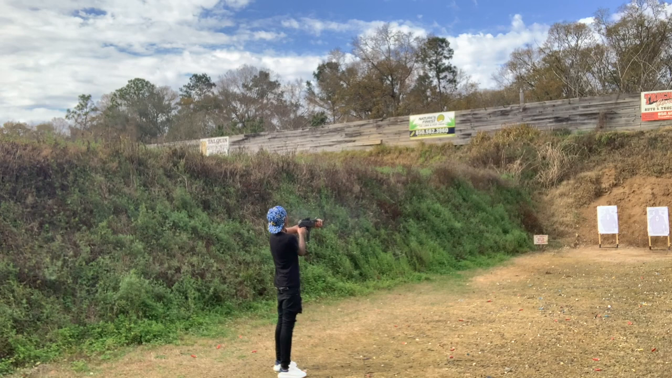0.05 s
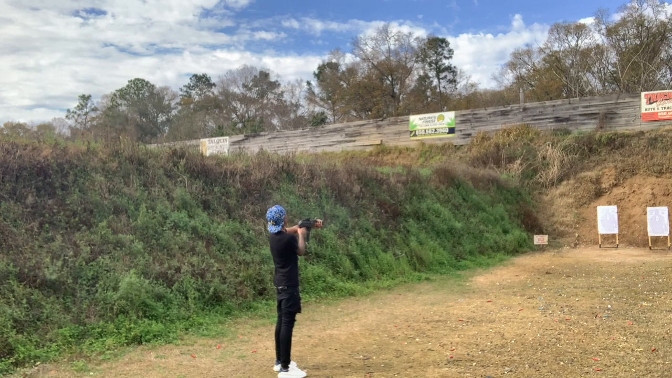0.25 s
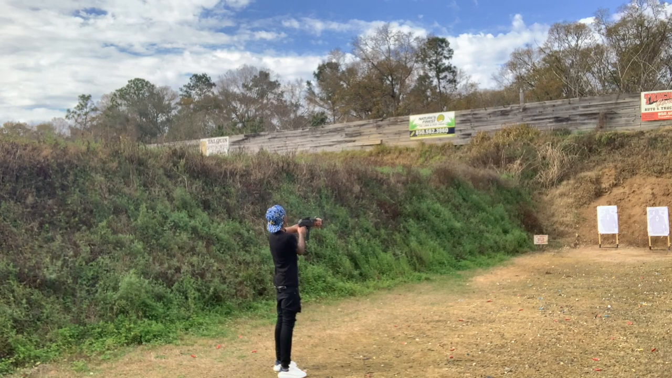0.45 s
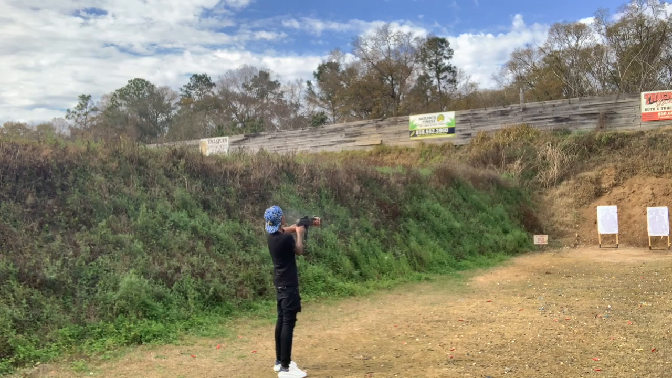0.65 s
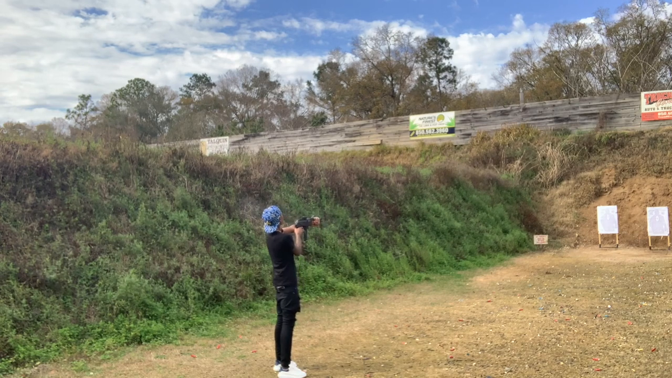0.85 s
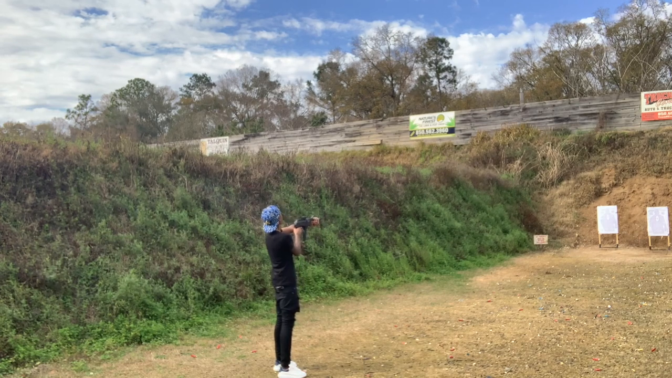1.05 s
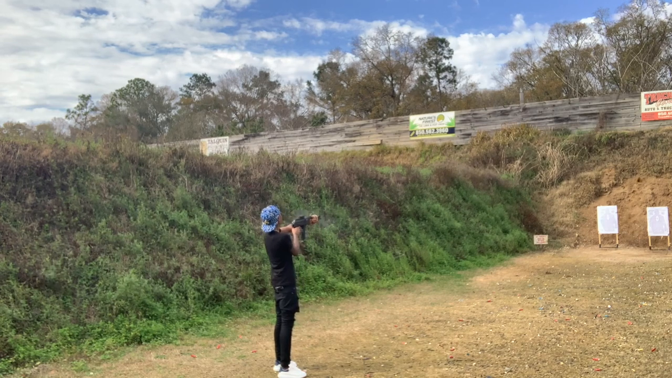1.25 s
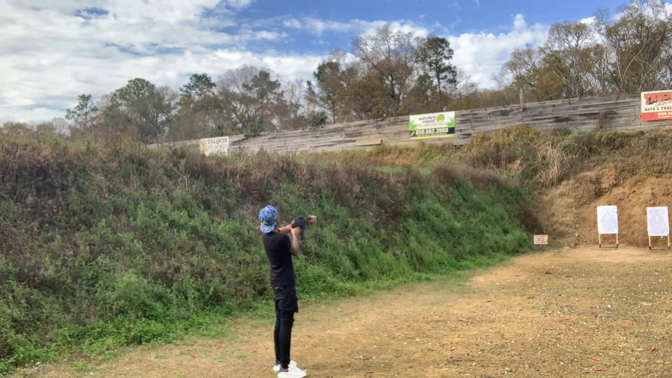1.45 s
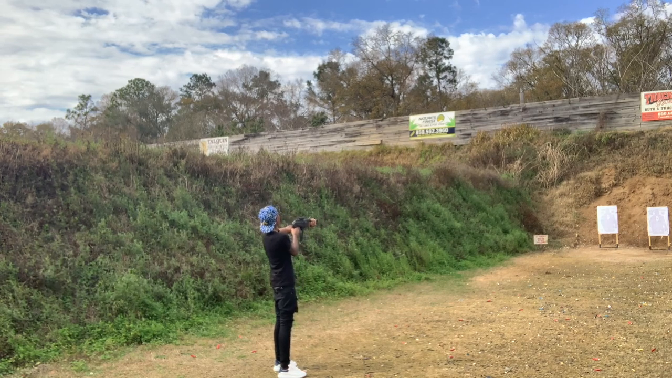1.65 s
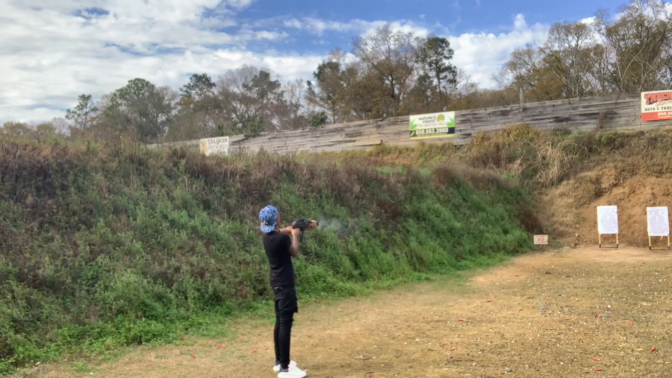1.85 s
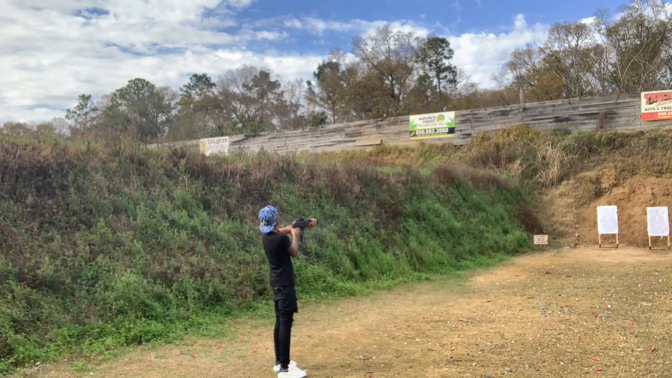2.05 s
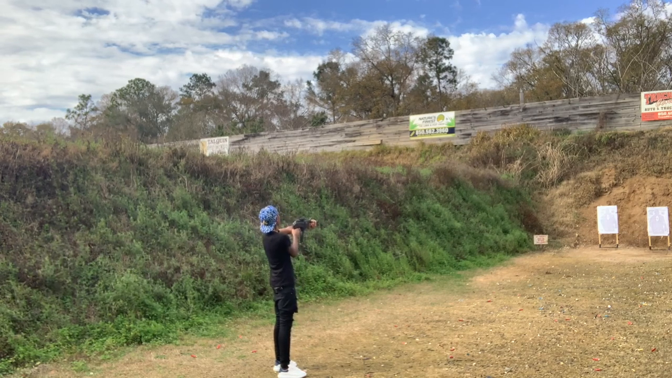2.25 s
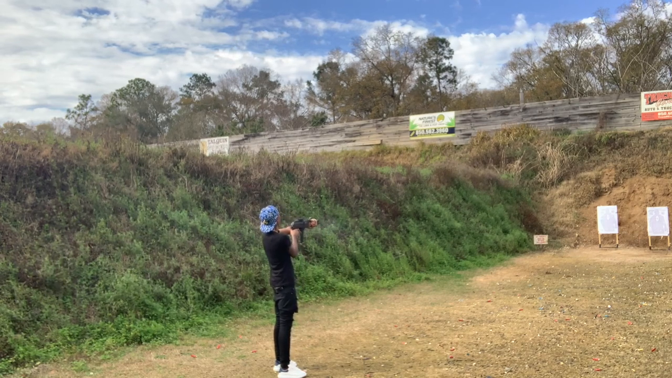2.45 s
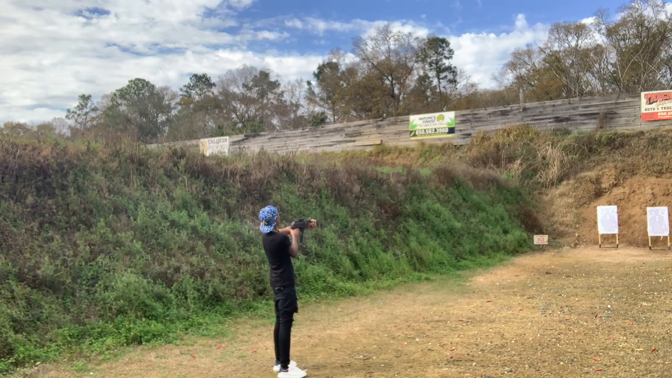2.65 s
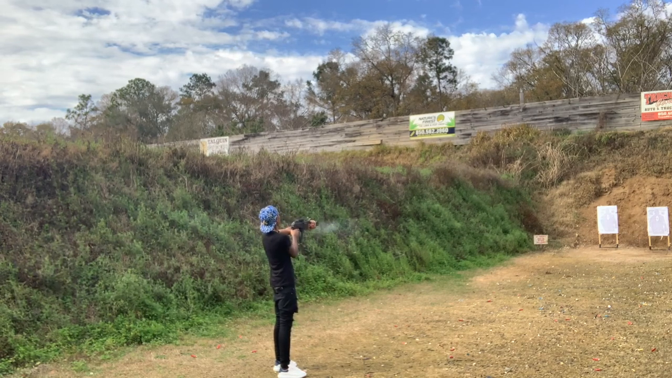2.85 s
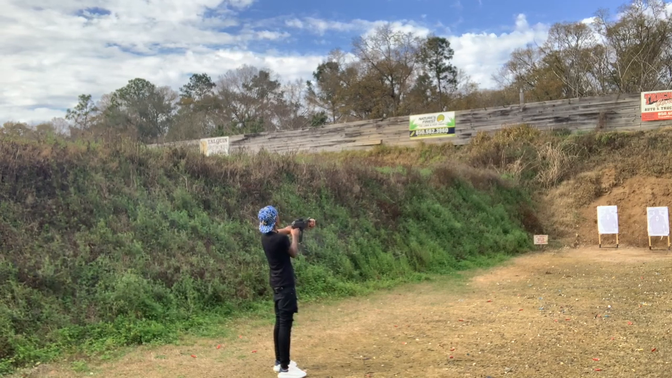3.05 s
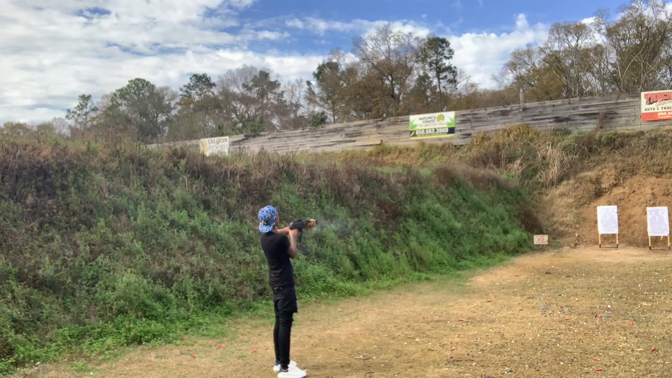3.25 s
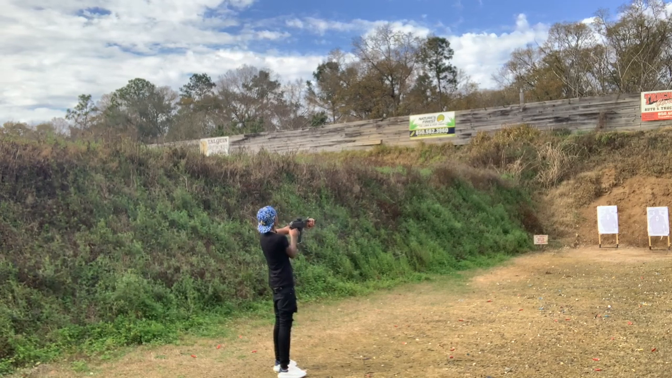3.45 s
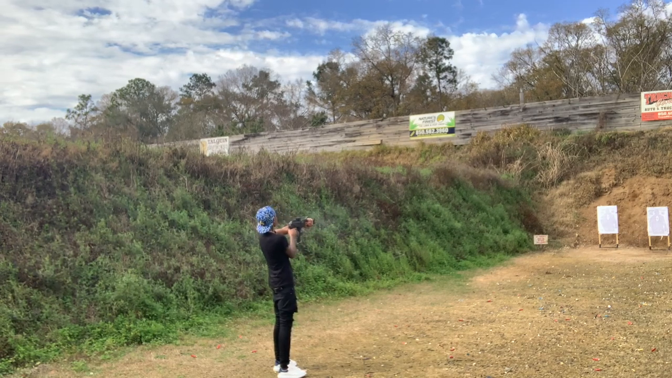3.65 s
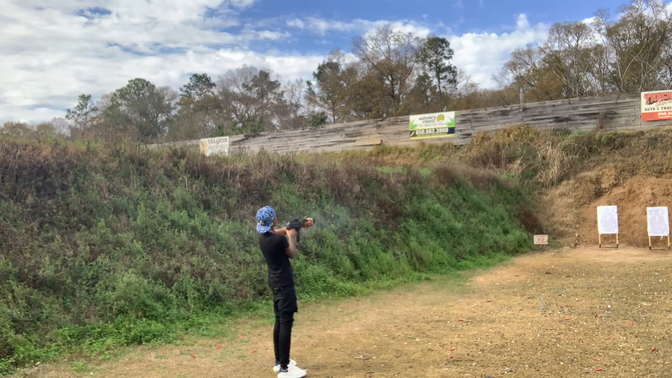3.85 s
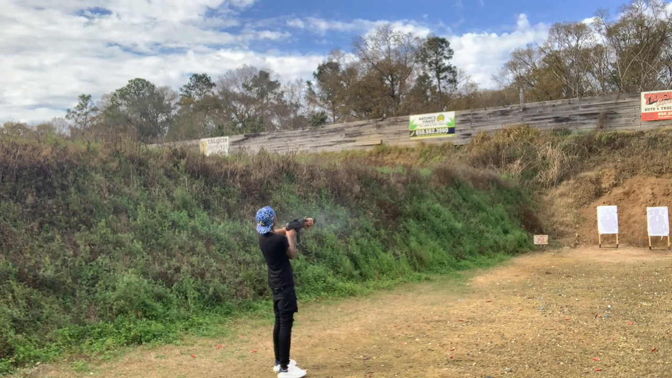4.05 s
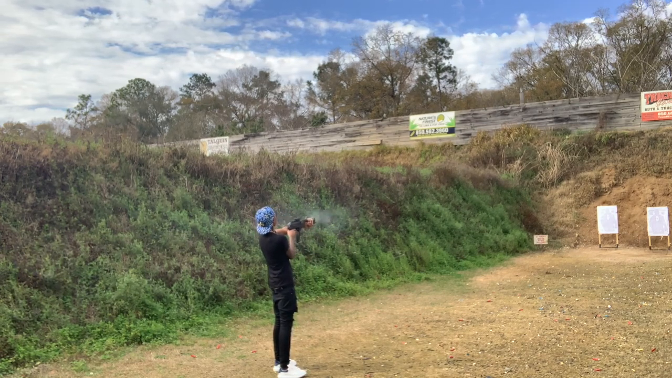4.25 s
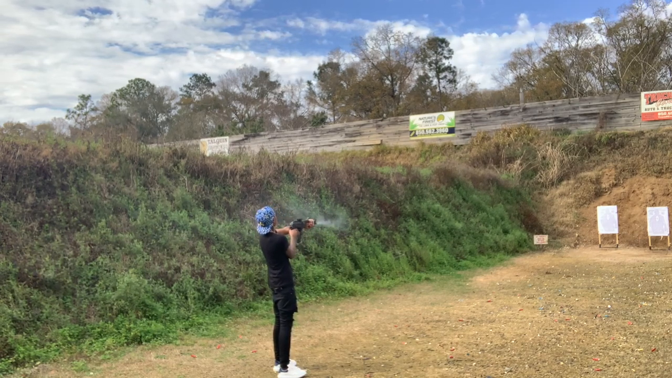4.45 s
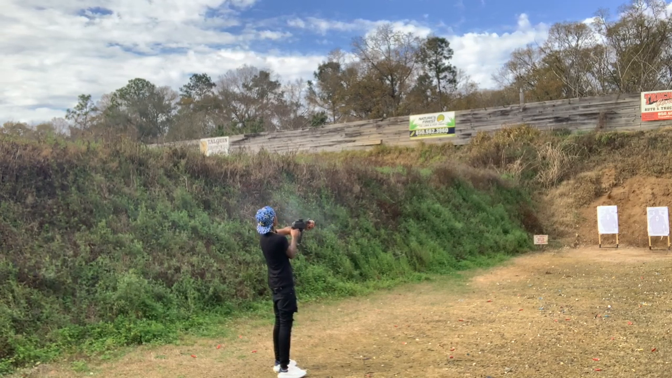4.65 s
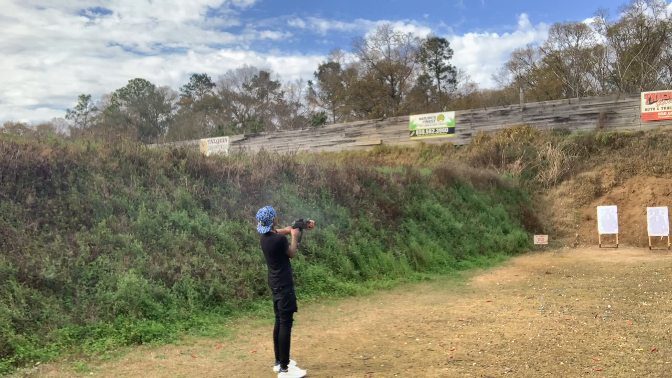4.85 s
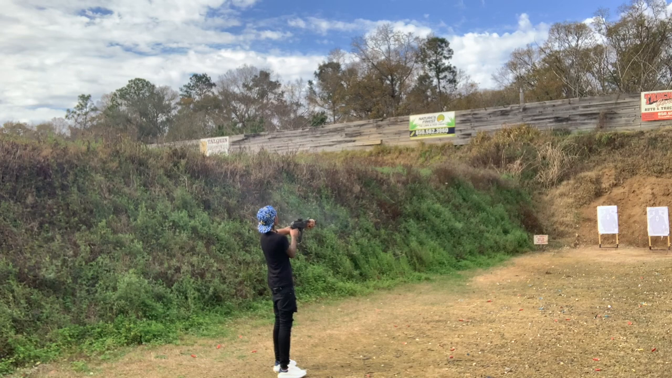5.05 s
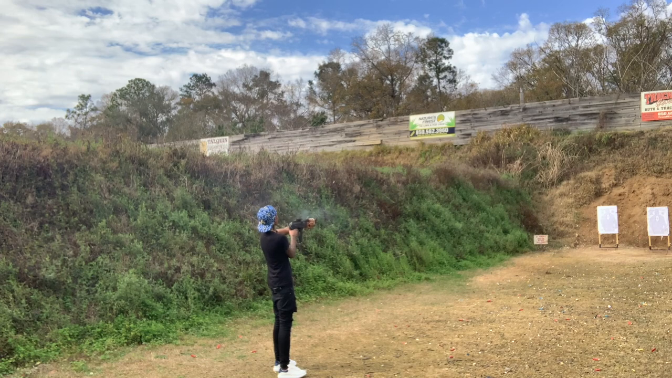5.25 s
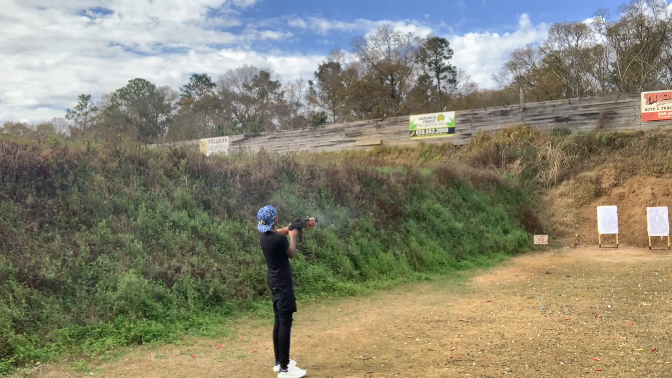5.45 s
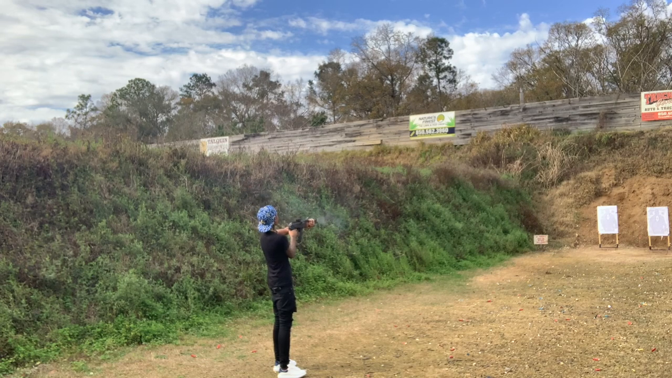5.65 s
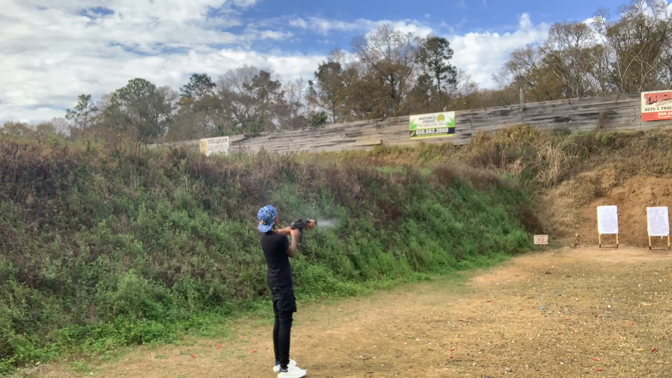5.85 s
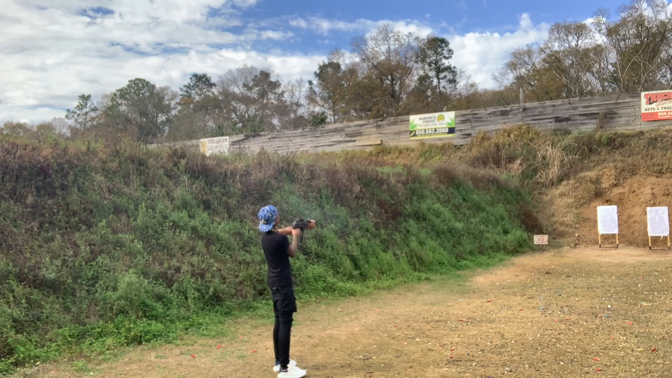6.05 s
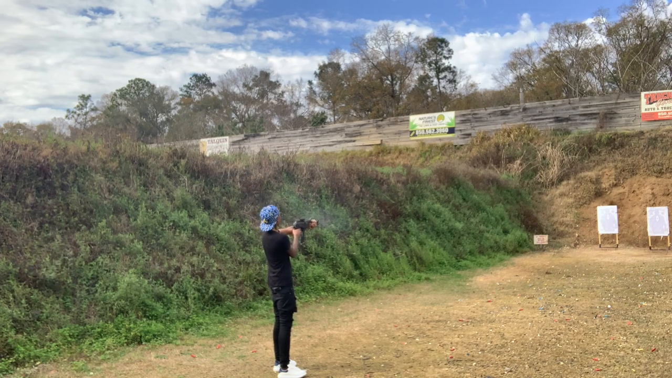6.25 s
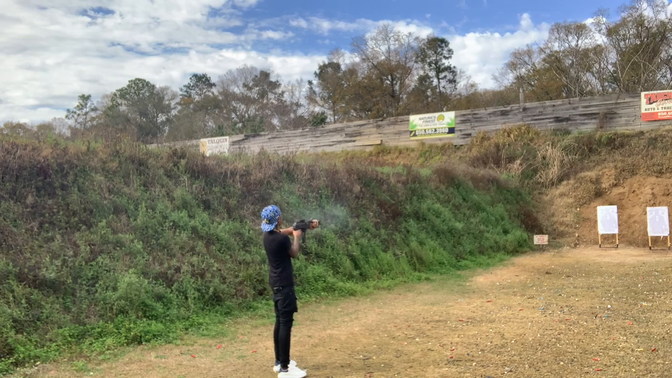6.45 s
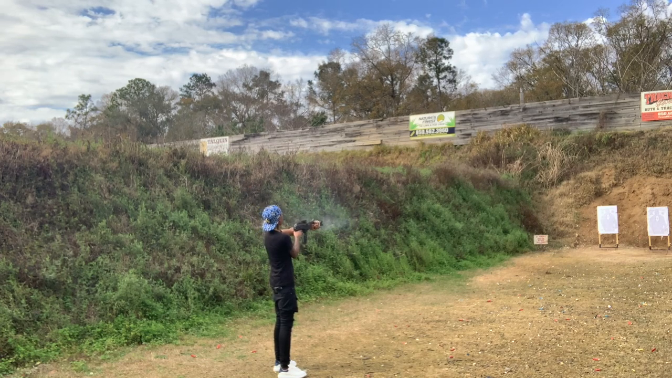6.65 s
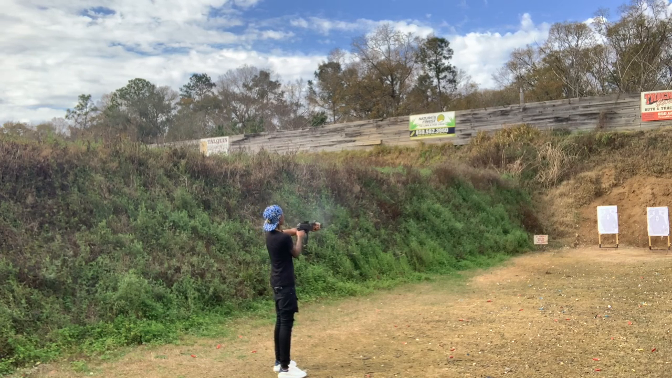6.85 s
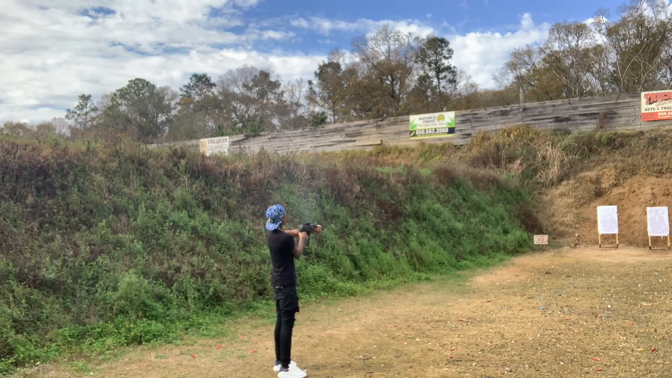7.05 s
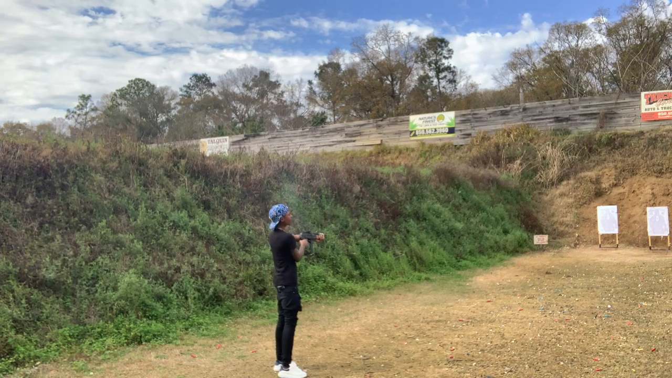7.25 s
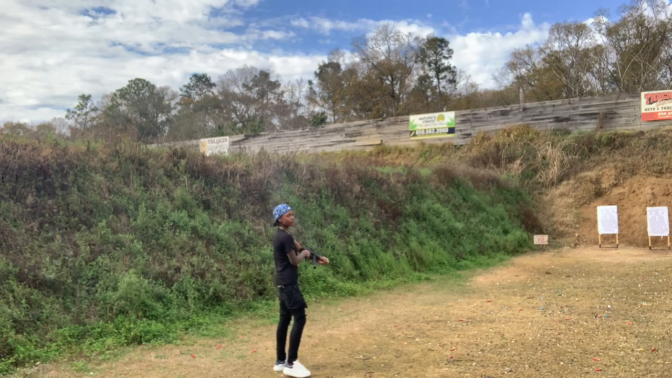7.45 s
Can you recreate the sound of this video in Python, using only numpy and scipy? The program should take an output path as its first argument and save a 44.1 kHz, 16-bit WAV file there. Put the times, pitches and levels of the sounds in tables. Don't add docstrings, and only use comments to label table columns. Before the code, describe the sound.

An open-air shooting range with earth banks, heard in stereo from a phone some metres behind the rifle. For the first half second, low gusts and soft pops buffet the microphone over the fading roll of an earlier shot. At 0.49 s a hard, overloaded crack bursts out, with more at about 1.17, 1.84, 2.38, 2.84, 3.2 and 3.5 s, the gaps shrinking. From about 3.8 to 6.6 s the shots run in an even string, roughly four per second, twenty in all. Each has a steep crack, brief gas rush and short low thump, then a bright slap from the right bank a tenth of a second later, a duller second slap and diffuse roll from trees. Dull knocks sound near 1.3, 2.0 and 6.5 s; brass cases tink faintly, clearest around 5.5 and 6.9 s. After the last shot the echo dies into light wind.

```python
import sys
import numpy as np
from scipy import signal
from scipy.fft import rfft, irfft, next_fast_len
from scipy.io import wavfile
from scipy.ndimage import uniform_filter1d

SR = 44100
rng = np.random.default_rng(int(sys.argv[2]) if len(sys.argv) > 2 else 0)


def int16_out(signal):
    q = np.round(np.clip(np.atleast_2d(signal).T, -1, 1) * 32767)
    wavfile.write(sys.argv[1], SR, q.astype(np.int16))


def to_linear_factor(level_db):
    exponent = np.asarray(level_db, float) / 20
    return 10 ** exponent


N = 331191
LEAD = .03


def burst(t, rise, fall):
    return np.exp(-np.abs(t) / np.where(t < 0, rise, fall))


def at(table, s):
    power = sum((to_linear_factor(db) * burst(s - peak, abs(rise), abs(fall))) ** 2 for peak, db, rise, fall in table)
    return np.sqrt(power)


def colour(x, spectrum, lag=0):
    size = next_fast_len(x.shape[-1])
    hz = np.maximum(np.fft.rfftfreq(size, 1 / SR), 1)
    points_hz, points_db = np.array(spectrum).T
    gain = to_linear_factor(np.interp(np.log(hz), np.log(points_hz), points_db))
    gain = gain / np.sqrt(np.mean(gain ** 2))
    gain = gain * np.exp(-2j * np.pi * lag * np.log(hz))
    return irfft(rfft(x, size) * gain, size)[..., :x.shape[-1]]


def scatter(length, same, alike):
    size = 2 ** int(np.log2(length * SR) + 1)
    fixed = rng.standard_normal((1, 3, size))
    fresh = rng.standard_normal((len(SHOTS), 3, size))
    x = np.sqrt(same) * fixed + np.sqrt(1 - same) * fresh
    return np.arange(size) / SR, np.sqrt(alike) * x[:, :1] + np.sqrt(1 - alike) * x[:, 1:]


def late(x, s):
    return np.roll(x, int(s * SR), axis=-1)


def add(out, sound, s):
    i = int(s * SR)
    out[:, i:i + sound.shape[-1]] += sound[..., :N - i]


def walk(rate):
    k = int(SR / rate)
    held = np.repeat(rng.standard_normal((2, N // k + 1)), k, axis=1)
    return 0.97 * uniform_filter1d(held, k)[:, :N]


# peak_s, level_db, rise_s,
# fall_s
GUSTS = [(.19, -20.5, 0.089, .3), (.345, -21.5, .08, 0.095), (.472, -16, 0.018, 0.023),
         (.606, -36, 0.023, 0.036), (.688, -23.5, 0.0057, .02), (.735, -32, 0.016, 0.064),
         (1.15, -44, 0.0076, 0.037), (1.52, -33.5, 0.012, .1), (1.646, -32.5, 0.1, .02),
         (1.83, -34, 0.0093, 0.028), (1.96, -35.5, .006, .2), (2.074, -28.5, 0.016, 0.058),
         (2.194, -30, 0.014, 0.34), (2.4, -39, .03, 0.27), (2.64, -35, .015, 0.026),
         (2.79, -31.5, 0.029, .05), (3.138, -29.5, 0.077, 0.011), (3.2, -32, 0.019, 0.071),
         (3.35, -42, 0.033, 0.18), (3.52, -32, 0.0034, 0.029), (3.71, -42, 0.11, .5),
         (4.51, -41, 0.38, 0.64), (5.07, -34, 0.11, 0.083), (5.5, -34, 0.027, .06), (5.9, -43, 0.59, .3),
         (6.225, -27.5, 0.02, .025), (6.5, -39.5, 0.12, 0.15), (6.72, -38, 0.012, 0.25),
         (6.98, -37.5, 0.024, 0.12), (7.3, -38.5, 0.048, 0.34)]
# pitch_hz, level_db (per Hz)
BUFFET = [(12, -31.5), (20, -7), (76, 10.5), (455, -19), (498, -12.5), (630, -17.5), (728, -30.5),
          (921, -22), (1500, -28), (1950, -56), (3300, -120)]
# peak_s, level_db, rise_s, fall_s
EARLIER = [(.09, -28.5, 0.035, 0.18)]
# pitch_hz, level_db (per Hz)
TREES = [(80, -3.5), (300, 0), (1000, -1.5), (2200, -0.5), (3200, -9.5), (5000, -14), (7500, -23.5),
         (11000, -32), (16000, -64.5)]


def wind_and_leaves():
    t = np.arange(N) / SR
    gust = np.hypot(at(GUSTS, t), to_linear_factor(-53))
    eddies = colour(rng.standard_normal((2, N)), BUFFET) * to_linear_factor(4.2 * walk(25))
    flap_tone = [(100, -9.5), (250, -3.0), (500, -6.0), (1200, -35.5), (4000, -53.5)]
    flaps = colour(rng.standard_normal((2, N)), flap_tone) * to_linear_factor(6.5 * walk(40))
    flap_gain = to_linear_factor(-20.5) * (gust / to_linear_factor(-34.5)) ** .5
    leaves = colour(rng.standard_normal((2, N)), TREES) * (at(EARLIER, t) + to_linear_factor(-67.5))
    return gust * (eddies + flap_gain * flaps) + leaves


# start_s, peak_db, low_body_db
POPS = [(0.164, -29, -42), (0.2, -25.5, -22.5), (0.253, -17, -25), (0.276, -22, -31), (0.378, -27, -47),
        (0.44, -19, -16.5), (0.7, -35.5, -41), (0.796, -34.5, -32), (1.505, -54, -31.5), (2.198, -32, -37),
        (3.138, -34, -45)]


def port_pops():
    out, t = np.zeros((2, N)), np.arange(4096) / SR
    tone = [(80, -7.0), (250, -6.5), (600, -16.5), (1400, -30.5), (3000, -65.5), (8000, -87.5)]
    for s, db, body_db in POPS:
        puff = rng.standard_normal((2, len(t))) * burst(t - .02, 0.0039, 0.015)
        add(out, to_linear_factor(db + 6) * colour(puff, tone), s - .016)
        push = np.sin(2 * np.pi * 95 * t + 6 * rng.random((2, 1))) * burst(t - .025, 0.0044, 0.0076)
        add(out, to_linear_factor(body_db + 7.5) * push, s - .016)
    return out


# start_s, peak_db, pitch_hz
KNOCKS = [
    (1.281, -14.5, 1530),
    (2.035, -6.5, 785),
    (2.99, -28, 1530),
    (3.065, -31, 980),
    (6.531, -13, 760),
]


def knocks():
    out, t = np.zeros((2, N)), np.arange(4096) / SR
    shape = burst(t - .006, 0.0003, 0.0062) + to_linear_factor(-10) * burst(t - .006, 0.0009, 0.027)
    for s, db, hz in KNOCKS:
        tone = [(hz / 4, -24), (hz, 0), (hz * 1.9, -10), (hz * 4, -22), (15000, -36)]
        blow = rng.standard_normal((2, len(t))) * shape
        add(out, to_linear_factor(db - 6.5) * colour(blow, tone, lag=0.372), s - .006)
    return out


# start_s, peak_db, ring_db, lowest_mode_db
CASES = [(.345, -54, -14, -8), (1.113, -58, -15, -9), (1.39, -65, -10, -10), (2.223, -38, -16, -25),
         (3.123, -36.5, -20, -10), (3.463, -37.5, -5.5, -9), (5.475, -30, -4, -10), (6.852, -33.5, -25, -7),
         (6.871, -40, -30, -7), (7.01, -67, -20, -10), (7.09, -83, -18, -15), (7.242, -70, 0, -13),
         (7.376, -42.5, -24, 23)]
# pitch_hz, level_db, time_to_fade_60_db_s
CASE_MODES = [
    (5700, -15, 0.14),
    (8100, 1, 0.095),
    (10600, -2, 0.19),
    (15030, 5, 0.12),
    (15600, -24, .07),
]


def cases():
    out, t = np.zeros((2, N)), np.arange(8192) / SR
    tick_tone = [(700, -38.0), (2000, -2), (5000, 0.5), (9000, 6.5), (15500, -5.5), (17000, -9)]
    for s, db, ring_db, low_db in CASES:
        chance = rng.standard_normal((len(CASE_MODES), 2))
        lift = to_linear_factor([low_db] + [0] * (len(chance) - 1)) * to_linear_factor(3.7 * chance[:, 0])
        ring = np.zeros(len(t))
        for (hz, mode_db, t60), gain, shift in zip(CASE_MODES, lift, chance[:, 1]):
            tone = np.sin(2 * np.pi * hz * (1 + 0.0027 * shift) * t)
            ring += gain * to_linear_factor(mode_db) * tone * 1000 ** (-t / t60)
        ring = to_linear_factor(ring_db) * ring * (1 - t / t[-1])
        tick = rng.standard_normal((2, len(t))) * (np.exp(-t / 0.0026) + to_linear_factor(-13.0) * np.exp(-t / 0.02))
        add(out, to_linear_factor(db + 4.5) * (ring + colour(tick, tick_tone)), s)
    return out


# peak_s, level_db, rise_s, fall_s
TREES_BACK = [
    (.16, -30.5, 0.04, 0.055),
    (.43, -41.5, 0.21, 0.15),
    (.6, -62.5, .1, .16),
]


def tree_roll():
    t, n = scatter(1.2, same=0.13, alike=0.033)
    return colour(n * at(TREES_BACK, t), TREES)


# pitch_hz, level_db (per Hz)
BANK_LEFT = [(120, -80), (400, -42), (800, -40), (1300, -3), (2000, 3.5), (2800, -10.5), (4200, -13),
             (6500, -11.5), (7800, -7), (9500, -10.5), (11000, -14), (15500, -22.5), (16800, -53)]
# pitch_hz, level_db (per Hz)
BANK_RIGHT = [(120, -62.5), (350, -12), (800, -11), (1300, -5), (2000, -6), (2800, -18.5), (4500, -12.5),
              (6500, -29), (7800, -6), (9500, 0.5), (11000, -14.5), (15500, -35.5), (16800, -45)]


def from_bank(x, lag=0):
    left = np.roll(colour(x[:, 0], BANK_LEFT, lag), 10, axis=-1)
    return np.stack([left, colour(x[:, 1], BANK_RIGHT, lag)], axis=1)


# pitch_hz, level_db (per Hz)
SCRUB = [(80, -17.5), (300, 1), (1200, -0.5), (2200, 1), (3200, -4.5), (4800, -3), (7300, -6), (11000, -5),
         (15500, -12.5), (16800, -49.5)]
# peak_s, level_db, rise_s, fall_s
SCRUB_BACK = [
    (.0045, -9, 0.00061, 0.016),
    (.013, -17.5, 0.0056, 0.052),
    (.13, -26, .11, .017),
]
# peak_s, level_db, rise_s, fall_s
BANK_BACK = [
    (.097, -6, 0.0015, 0.012),
    (.114, -14.5, 0.0055, .02),
    (.133, -17.5, 0.014, .009),
    (.15, -31, .01, .022),
    (.26, -38, .02, .004),
]


def bushes_and_ledges():
    t, n = scatter(.3, same=0.28, alike=0.022)
    held = np.repeat(rng.standard_normal((len(SHOTS), 2, 256)), 64, axis=-1)
    clumps = to_linear_factor(2.4 * uniform_filter1d(held, 64))
    bushes = colour(n * clumps * at(SCRUB_BACK, t), SCRUB)
    t, n = scatter(.3, same=0.69, alike=1.0)
    return bushes + to_linear_factor(-4.0) * from_bank(n * clumps[::-1, :1] * at(BANK_BACK, t))


# pitch_hz, level_db (per Hz)
FAR_FACE = [(90, -37.5), (250, -13), (600, 1.5), (1100, -4.5), (1800, -7.5), (2800, -11), (4200, -27.5),
            (7000, -20), (16000, -42)]


def bank_slaps():
    t, n = scatter(.04, same=0.61, alike=0.77)
    front = to_linear_factor(1) * burst(t - LEAD, .00003, .00003)
    fray = to_linear_factor(1) * n * burst(t - LEAD, 0.0001, 0.00078)
    slap = from_bank(to_linear_factor(13) * front + fray, lag=1.1)
    slap = slap + to_linear_factor(-3.5) * late(slap, .00082)
    dull_fray = to_linear_factor(-3.0) * n[::-1] * burst(t - LEAD, 0.00033, 0.0084)
    return slap, colour(front + dull_fray, FAR_FACE, lag=3.2)


# pitch_hz, level_db (per Hz)
CHEST = [(90, -33.5), (170, -4.5), (280, -9), (420, 6), (560, 4), (720, 2.5), (1500, -53), (5000, -87.5)]


def thump_and_punch():
    t = np.arange(SR // 8) / SR
    turns = 58 * t + 120 * 0.011 * (1 - np.exp(-t / 0.0083))
    wave = np.sin(2 * np.pi * turns + np.array([[5.4], [4.6]]))
    thump = wave * burst(t - .009, 0.0064, 0.011) * to_linear_factor([[7], [8]])
    push = burst(t - np.array([[.0012], [.001]]), .0001, .0001)
    return thump, colour(push, CHEST, lag=1.7) * to_linear_factor([[19], [22]])


# pitch_hz, level_db (per Hz)
SHOCK = [(600, -45), (850, -19.5), (1100, -3.5), (1600, -3.5), (2150, -5), (2600, -10), (3500, -7.5),
         (5000, -12), (9000, -19.5), (16000, -20)]
# pitch_hz, level_db (per Hz)
BLAST = [(300, -28), (800, -6.5), (1200, -12.5), (2200, -3), (3000, -11.5), (5000, -7.5), (7300, -15.5),
         (9000, 1), (12000, -10.5), (15500, -14), (16800, -42.5)]


def muzzle_blasts():
    t, n = scatter(.05, same=0.22, alike=0.52)
    ground_s = 0.0019
    shock = colour(burst(t - LEAD - .0008, .00003, .00003), SHOCK, lag=0.795)
    ledge = late(uniform_filter1d(shock, size=12), 0.0097)
    front = to_linear_factor(8.5) * (shock + to_linear_factor(0.5) * late(shock, ground_s) + to_linear_factor(-10) * ledge)
    gas = to_linear_factor(0.5) * colour(n * burst(t - LEAD - .0012, 0.00041, 0.0007), BLAST, lag=0.4134)
    blast = front + gas + to_linear_factor(-4.5) * late(gas, ground_s)
    place = (np.array(SHOTS)[:, 0] * SR - 982) % 1024 / 1024
    hiss = n * burst(t - LEAD - .001, 0.0047, 0.00056)
    hiss = colour(hiss, [(1500, -10), (4000, -1), (7500, -5.5), (8500, -32.5)])
    return blast + to_linear_factor(-16 - 7.5 * place)[:, None, None] * hiss


# start_s, blast_peak_db, low_thump_db, bank_slap_db, second_slap_db
SHOTS = [(0.4875, 6, -18, -14, -16.5), (1.1651, 1.5, -25.5, -1.1, -15), (1.8392, 3.5, -27.5, -7.5, -14.5),
         (2.3793, 1.5, -48, 0.1, -17), (2.8398, 0, -24, -11.5, -19), (3.2139, -0.5, -32.5, 0, -16),
         (3.5307, 2.5, -11.5, -3.5, -14), (3.7758, 5.5, -18, -2.5, -12.5), (4.003, 4, -47, -2.5, -14.5),
         (4.2284, 4, -27, -3.8, -14.5), (4.46, 2, -17, -1.8, -16.5), (4.6912, 6, -42.5, -5.5, -14),
         (4.9293, 6.5, -24.5, 2, -13), (5.1659, 3.5, -13.5, 3.5, -11), (5.3928, 3.5, -16.5, -1, -15.5),
         (5.6315, 4, -21.5, -1.5, -15), (5.8691, 4, -19.5, -2.5, -15.5), (6.113, 6, -20, 3, -12.5),
         (6.35, 3, -18.5, -0.5, -16.5), (6.6016, 1, -20.5, -8, -15)]
# delay_after_blast_s, level_db
WEAK_FACES = [
    (.0095, -26),
    (0.113, -20),
    (0.119, -24.5),
]


def rifle():
    out = np.zeros((2, N))
    blast, (slap, dull) = muzzle_blasts(), bank_slaps()
    near, far = bushes_and_ledges(), tree_roll()
    thump, punch = thump_and_punch()
    for k, (s, db, thump_db, slap_db, second_db) in enumerate(SHOTS):
        add(out, to_linear_factor(db) * blast[k], s - LEAD)
        add(out, to_linear_factor(slap_db) * slap[k], s + .0945 - LEAD)
        add(out, to_linear_factor(second_db) * dull[k], s + .134 - LEAD)
        for delay_s, face_db in WEAK_FACES:
            add(out, to_linear_factor(face_db) * dull[k - 1, ::-1], s + delay_s - LEAD)
        add(out, to_linear_factor(-2.5) * near[k], s)
        sag = sum(np.exp((earlier[0] - s) / 0.47) for earlier in SHOTS[:k])
        add(out, to_linear_factor(-1.8 * sag) * far[k], s)
        punch_db = -27.5 - 0.081 * thump_db
        add(out, to_linear_factor(thump_db) * thump + to_linear_factor(punch_db) * punch, s)
    return out


def scene():
    return wind_and_leaves() + port_pops() + knocks() + cases() + rifle()


def band_limit(x):
    return signal.sosfilt(signal.butter(12, 16840, fs=SR, output="sos"), x)


# pitch_hz, share_in_common (0-1), left_lead_radians
PORTS = [(150, 0, .8), (400, .6, 2), (700, .6, 2.4), (950, 0, 2.6), (6300, 0, -np.pi), (8000, .996, -np.pi),
         (10000, .996, -np.pi), (11500, .85, -1.5), (13000, .93, 0)]


def record(dry):
    x = dry / (1 + np.abs(dry) ** 6) ** (1 / 6)
    size = next_fast_len(N)
    left, right = rfft(x, size)
    port_hz, tie, turn = np.transpose(PORTS)
    hz = np.arange(len(left)) * SR / size
    tie, turn = np.interp(hz, port_hz, tie), np.interp(hz, port_hz, turn)
    right = tie * left * np.exp(-1j * turn) + np.sqrt(1 - tie ** 2) * right
    x = to_linear_factor(-1.5) * irfft(np.array([left, right]), size)[:, :N]
    x = signal.sosfilt(signal.ellip(8, .2, 60, 16000, fs=SR, output="sos"), x)
    return band_limit(x)


dry = scene()
out = record(dry)
int16_out(out)
```